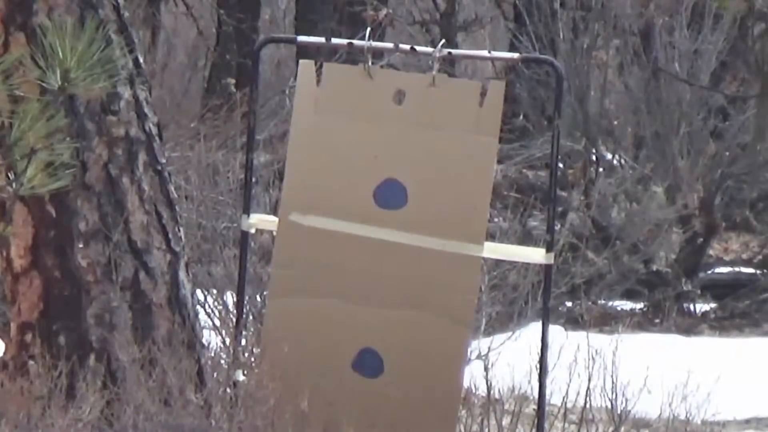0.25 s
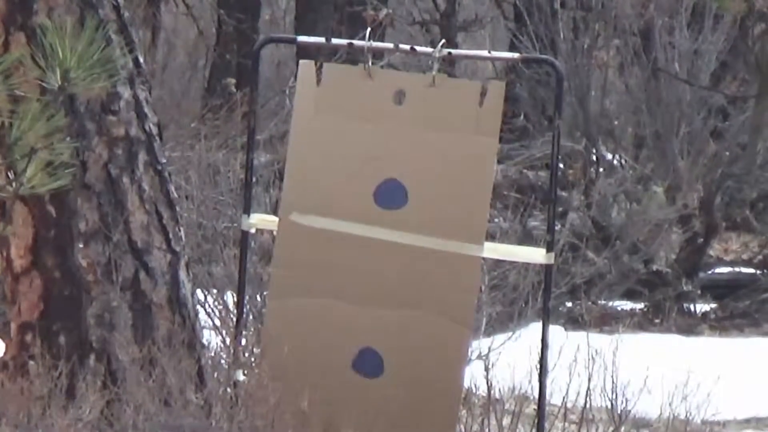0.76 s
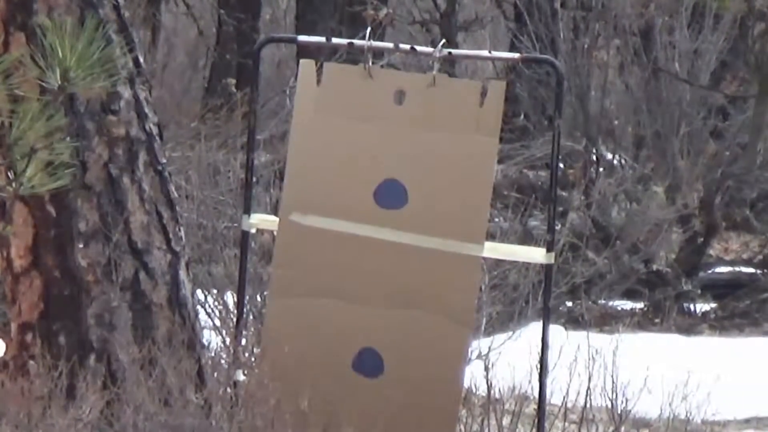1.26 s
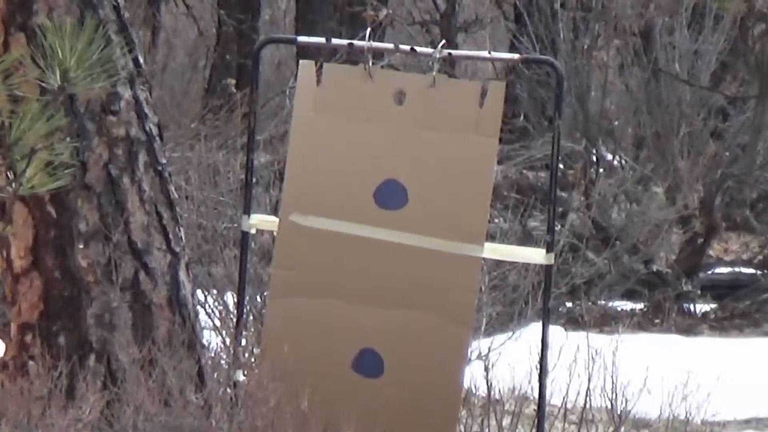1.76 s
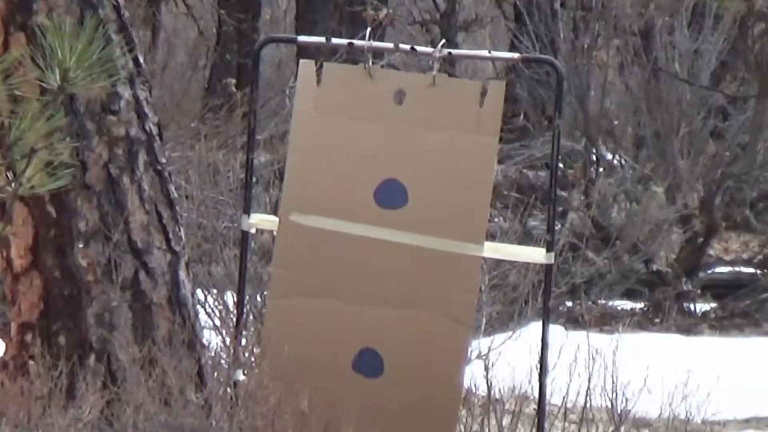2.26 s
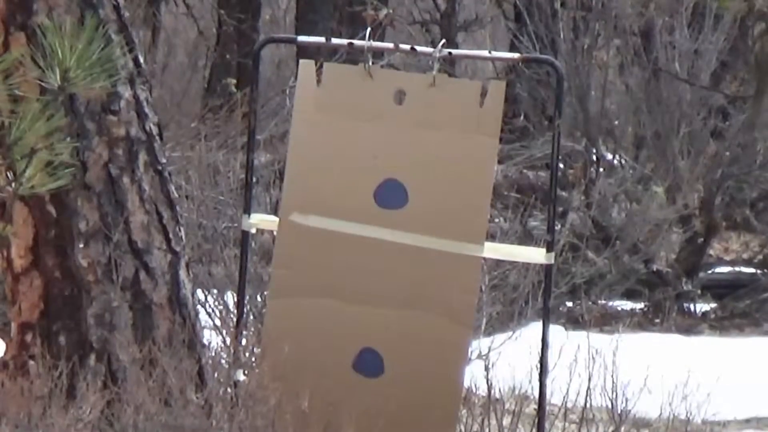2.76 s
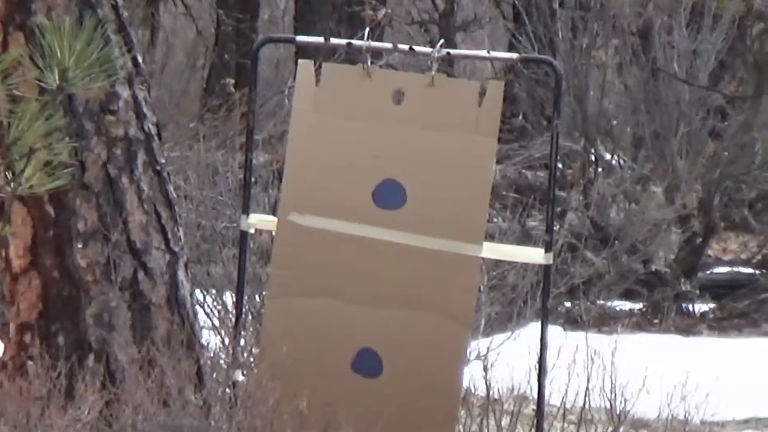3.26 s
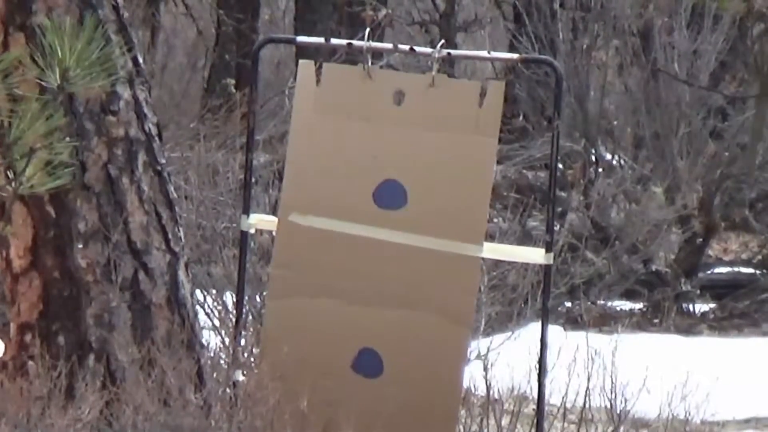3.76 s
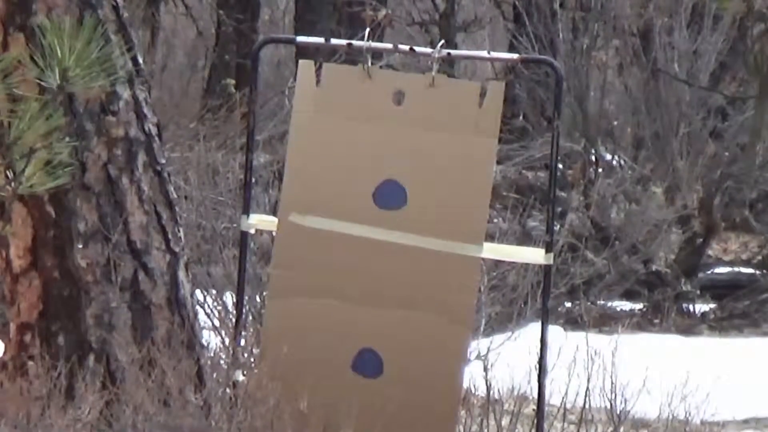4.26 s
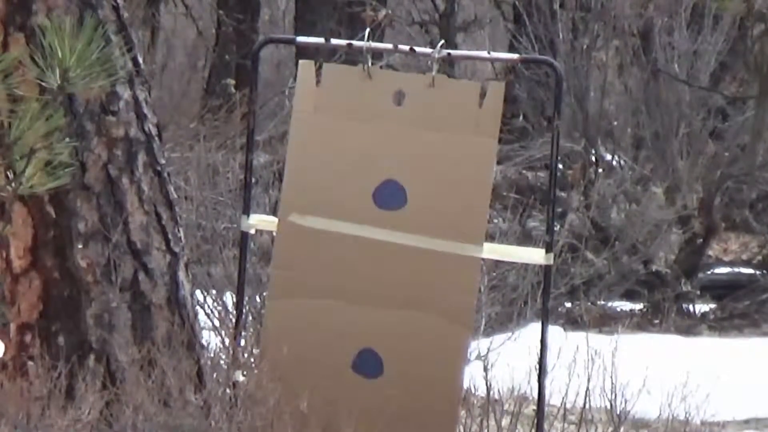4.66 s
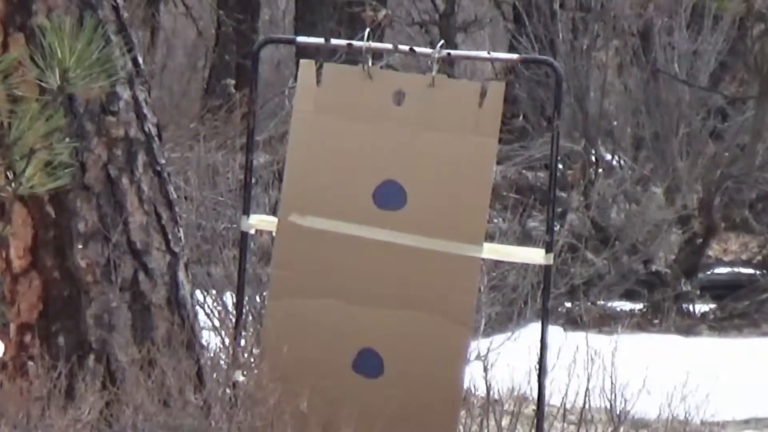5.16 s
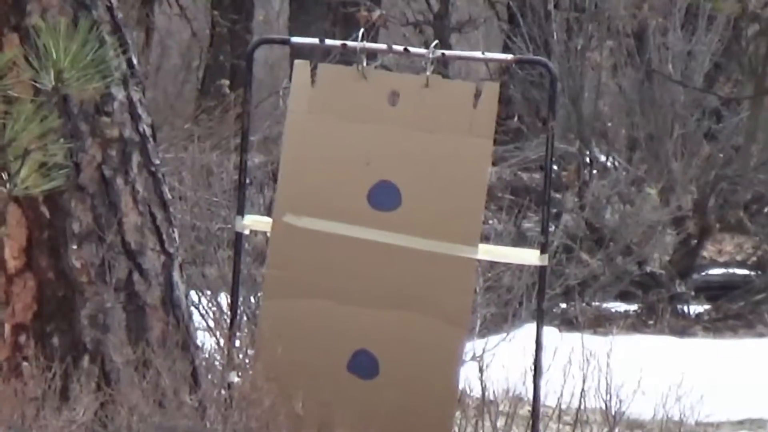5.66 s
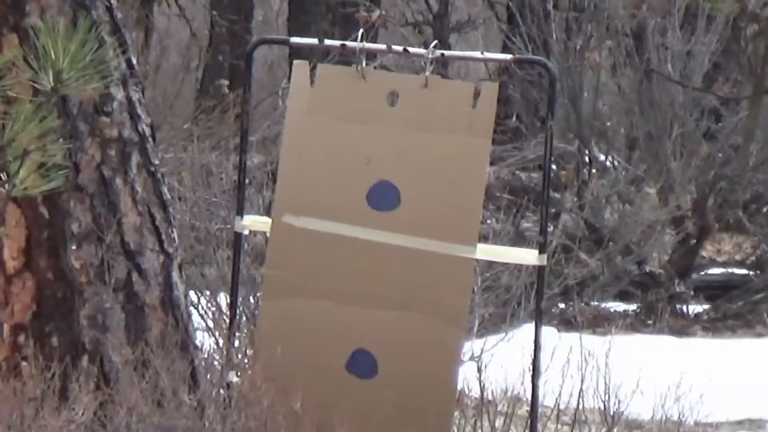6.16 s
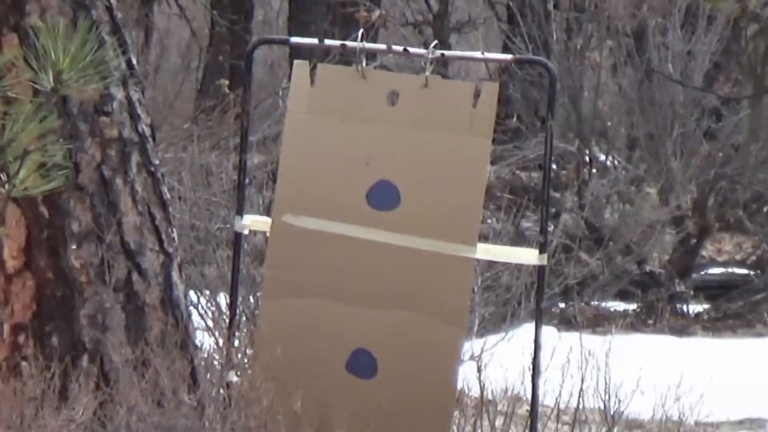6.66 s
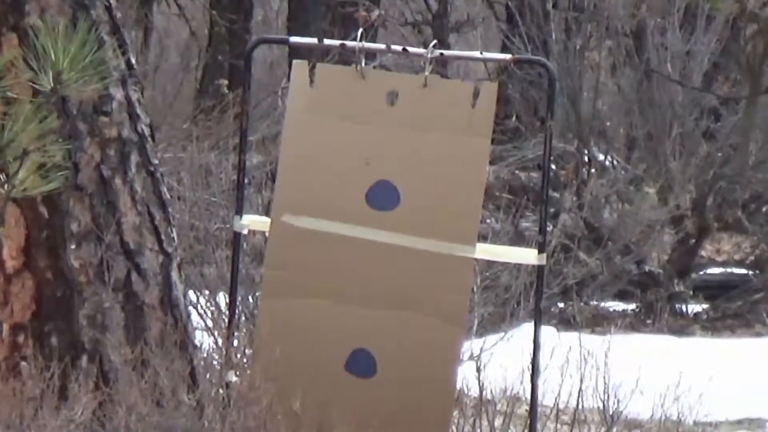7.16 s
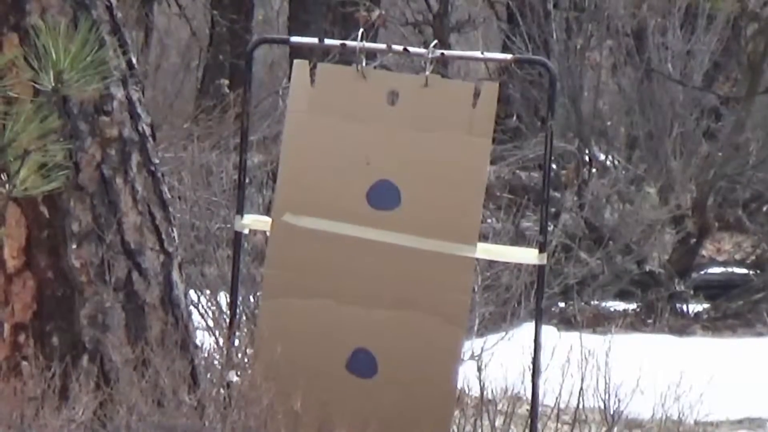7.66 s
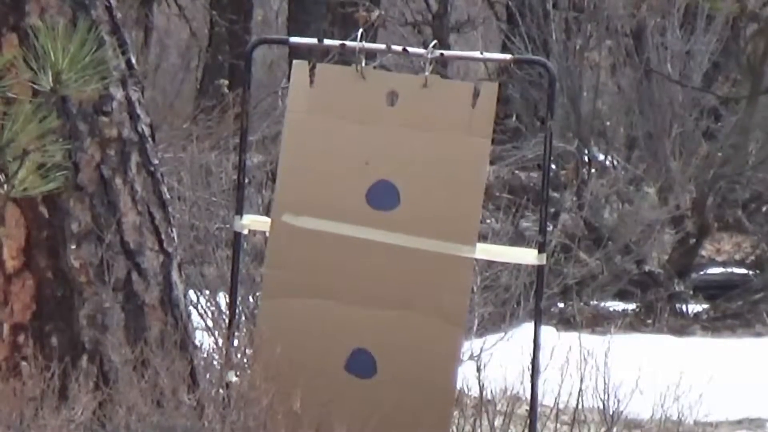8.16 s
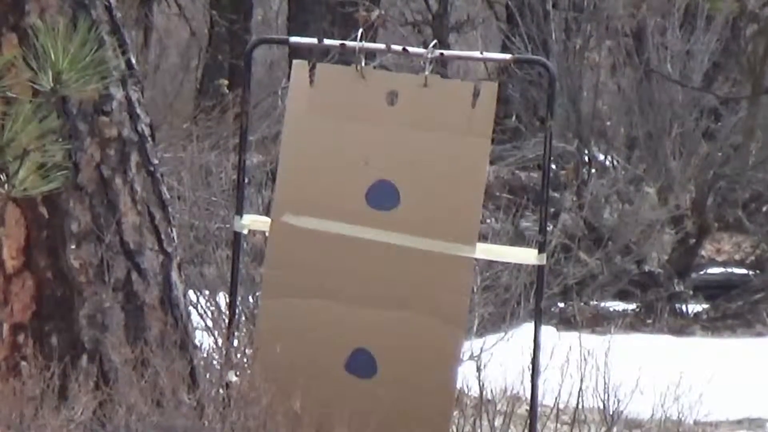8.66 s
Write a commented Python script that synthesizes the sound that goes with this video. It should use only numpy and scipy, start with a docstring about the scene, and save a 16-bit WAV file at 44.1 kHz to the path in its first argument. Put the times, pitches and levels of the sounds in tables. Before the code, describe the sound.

Outdoors among trees, a bolt-action rifle is cycled close by: metal clicks and slides, the wooden stock knocks and a sleeve rustles softly. After a pause of about two seconds comes a single loud shot, its crack followed by a dull boom and a long echo through the forest. While that fades, the bolt clacks back and forward once more and the empty case tinkles briefly.

```python
"""First comes the fading roll of a rifle shot, scattered by a snowy pine wood, over a faint hiss of air.
Close by on the right the bolt is worked: a sleeve brushes, the stock knocks, steel parts clack and
slide, and the struck brass case rings. The rifle fires again; the blast rolls back from trunks and a
hillside, duller as it fades because treble is absorbed along the way. A limiter holds the blast flat
for half a second. Then the bolt is worked once more."""
import sys
import numpy as np
from scipy import signal
from scipy.fft import rfft, irfft
from scipy.io import wavfile
from scipy.ndimage import uniform_filter1d

SR = 44100
rng = np.random.default_rng(int(sys.argv[2]) if len(sys.argv) > 2 else 0)


def store_wav(level_fs):
    """Save 16-bit WAV to argv[1]."""
    pcm = np.round(np.clip(np.atleast_2d(level_fs), -1, 1) * 32767)
    wavfile.write(sys.argv[1], SR, pcm.T.astype(np.int16))


N = 393813
TIME = np.arange(N) / SR
EARLIER_SHOT_S, SHOT_S = -2.11, 5.386  # of the earlier shot only the roll is heard
BODY_SIDE_DB, TICK_SIDE_DB = -8, -15  # stereo width (side minus mid) of full and of bright sounds


def undb(db):
    """Amplitude ratio of a level in decibels."""
    return 10 ** (np.asarray(db) / 20)


def unit(x):
    """Normalisation to an rms of 1."""
    return x / np.sqrt(np.mean(x ** 2))


def fade(t, t60):
    """Exponential decay from t = 0, falling 60 dB in t60 seconds."""
    return (t >= 0) * np.exp(-np.log(1000) * np.maximum(t, 0) / t60)


def pulse(t, rise_s, t60):
    """Exponential decay with a linear onset."""
    return fade(t, t60) * np.clip(t / rise_s, 0, 1)


def add(out, s, x):
    """Superposition of x on out from time s."""
    i = int(s * SR)
    out[..., i:i + x.shape[-1]] += x[..., :max(N - i, 0)]


def at_hz(hz, table, column=1):
    """Interpolation of a spectrum table on a logarithmic frequency axis."""
    rows = np.array(table)
    return np.interp(np.log(np.maximum(hz, 1)), np.log(rows[:, 0]), rows[:, column])


def colour(x, table, size=2048):
    """Minimum-phase filtering: folding the cepstrum makes the given spectrum causal."""
    gain = undb(at_hz(np.linspace(0, SR / 2, size // 2 + 1), table))
    cepstrum = irfft(np.log(gain))
    cepstrum[1:size // 2] *= 2
    cepstrum[size // 2 + 1:] = 0
    response = irfft(np.exp(rfft(cepstrum)))
    return signal.fftconvolve(x, response[None], axes=1)[:, :x.shape[1]]


def noise(size, side_db):
    """Partly coherent stereo noise: an in-phase part plus a weaker antiphase part."""
    mid, side = rng.standard_normal((2, size))
    return unit(mid + undb(side_db) * np.array([side, -side]))


def pan(x, left_db):
    """Placement by level difference, left minus right."""
    return x * undb(np.array([[1], [-1]]) * left_db / 2)


def band(x, lo_hz, hi_hz, order=2):
    """Butterworth band-pass filtering."""
    return signal.sosfilt(signal.butter(order, [lo_hz, hi_hz], "band", fs=SR, output="sos"), x)


def walk(rate_hz):
    """Smooth random modulation with an rms of 1."""
    step = int(SR / rate_hz)
    stairs = np.repeat(rng.standard_normal(N // step + 1), step)
    return unit(uniform_filter1d(stairs, step)[:N])


def ring(t, modes):
    """Free vibration: a sum of damped sinusoidal modes."""
    return sum(undb(db) * np.sin(2 * np.pi * hz * t) * fade(t, t60) for hz, db, t60 in modes)


# Echo spectrum of the wood: f/Hz, level/dB, loss on top of the overall decay/(dB/s)
WOOD_SPECTRUM = [(30, -67, 12), (55.5, -47, -6), (85, -15.5, -3), (150, -4, 4.5), (277, -1, -2.5),
                 (480, -2.5, -3.5), (780, 1, -2), (950, -2.5, -2), (1460, 2, 1), (2350, 3.5, 10),
                 (3570, 9, 26), (5020, 4.5, 36), (6000, -7, 37), (11200, 3, 73), (15000, -11, 98)]
# Stereo width of the echoes: f/Hz, side minus mid level/dB
ECHO_WIDTH = [(60, 1), (110, -28), (200, -34), (380, -16), (700, -10), (1290, -7), (2380, -11), (4400, -35),
              (8120, -39), (15000, -86)]
# Their lean to the left: f/Hz, left minus right level/dB
ECHO_LEAN = [(60, 1.5), (110, 2.4), (200, 1.1), (380, 1.5), (700, 1.8), (1290, 1.6), (2380, 0.0),
             (4400, 0.0), (8120, 0.0), (15000, 0.0)]
def echoes(shot_s, patchy_db=1.27, size=1024):
    """Absorption: later echoes have travelled further and lost more treble."""
    hz, t, (mid, side) = signal.stft(rng.standard_normal((2, N)), SR, nperseg=size)
    side = side * undb(at_hz(hz, ECHO_WIDTH))[:, None]
    lean = pan(np.ones(len(hz)), at_hz(hz, ECHO_LEAN))[..., None]
    field = np.array([mid + side, mid - side]) * lean
    patches = uniform_filter1d(rng.standard_normal(mid.shape), 3, axis=0)
    patches = unit(uniform_filter1d(patches, 4, axis=1))  # interference, in frequency and time
    loss_db = np.outer(at_hz(hz, WOOD_SPECTRUM, column=2), np.maximum(t - shot_s, 0))
    tone_db = at_hz(hz, WOOD_SPECTRUM)[:, None] - loss_db + patchy_db * patches
    return signal.istft(field * undb(tone_db), SR, nperseg=size)[1][:, :N]


# Denser stands of trees that answer together: delay/s, level over the even roll/dB, T60/s
TREE_STANDS = [(0.269, -27, 0.11), (.41, 15, 0.19), (.52, 7.5, .4)]
def roll(gain_db=22, build_s=0.31, knee_s=0.41, swell_db=1.4, stand_rise_s=0.043):
    """Scattering from countless trunks: the reverberation builds, then decays by a power law."""
    out = np.zeros((2, N))
    for shot_s in (EARLIER_SHOT_S, SHOT_S):
        age = np.maximum(TIME - shot_s, 0)
        build = 1 - np.exp(-age / build_s)  # ever more trunks join in
        decay = (1 + age / knee_s) ** -4
        stands = sum(undb(db) * pulse(age - s, stand_rise_s, t60) for s, db, t60 in TREE_STANDS)
        out += echoes(shot_s) * build * decay * (1 + stands)
    return out * undb(gain_db + swell_db * walk(22))


# Spectrum of still air and hiss: f/Hz, relative level/dB
AIR_SPECTRUM = [(18, -55), (30, -44), (137, -3.5), (156, -7.5), (230, -2), (341, -4), (709, -1.5),
                (970, 0.5), (1110, 1.5), (1230, 0.5), (1640, -2.5), (2620, -3.5), (15500, -15.5)]
def air(level_db=-58):
    """Stationary broadband noise: quiet woodland air under a steady hiss."""
    return unit(colour(noise(N, side_db=-6), AIR_SPECTRUM)) * undb(level_db)


# Movements of the arm: middle t/s, level/dB, half length/s
ARM_MOVES = [(1.46, -59, 1), (3.38, -59, 0.34), (7.85, -68, 0.39)]
def sleeve(rustle_db=1.2):
    """Friction of cloth: a high hiss swells and sinks with each move of the arm."""
    cloth = unit(band(noise(N, TICK_SIDE_DB), 4700, 19500, order=1))
    arm = sum(undb(db) * np.exp(-((TIME - s) / length) ** 2) for s, db, length in ARM_MOVES)
    return cloth * arm * undb(rustle_db * walk(22))


# Knocks of hand and bolt handle on the stock: t/s, relative level/dB, f/Hz, T60/s
STOCK_KNOCKS = [(1.035, -45, 850, 0.14), (1.357, -41, 483, 0.04), (1.581, -44, 1100, 0.16),
                (1.721, -33, 1577, 0.038), (2.148, -31, 1250, .1), (2.368, -43.5, 754, .08),
                (2.926, -42, 327, .1), (3.232, -46, 420, 0.15), (3.378, -34.5, 496, 0.071),
                (7.397, -28, 1740, 0.036), (8.066, -30.5, 1160, 0.098)]
def stock(gain_db=3, band_ratio=1.57, contact_s=0.0016, thump_db=-19.5, thump_hz=460, thump_t60=0.15):
    """Damped vibration of wood: the stock answers each knock and each clack with a dull noise burst."""
    out, t = np.zeros((2, N)), np.arange(8192) / SR
    thumps = [(s, body_db + thump_db, thump_hz, thump_t60) for s, body_db, _, _ in STEEL_CLACKS]
    for s, db, hz, t60 in STOCK_KNOCKS + thumps:
        wood = unit(band(noise(len(t), side_db=-25), hz / band_ratio, hz * band_ratio))
        add(out, s, undb(db + gain_db) * wood * pulse(t, contact_s, t60))
    return out


# Impacts of bolt and cartridge: t/s, relative body level/dB, relative tick level/dB, T60/s
STEEL_CLACKS = [(1.625, -27.5, -25.5, 0.028), (1.72, -27.5, -31, 0.027), (1.8363, -27.5, -15, 0.011),
                (1.841, -33.5, -31, 0.094), (1.862, -34, -28.5, 0.032), (1.996, -41.5, -50, 0.016),
                (2.108, -38, -39.5, 0.018), (2.136, -38, -32, .03), (2.144, -26, -21.5, 0.057),
                (2.165, -29, -26, 0.02), (2.191, -31, -18.5, 0.019), (2.21, -25, -21.5, 0.037),
                (2.25, -31, -19.5, 0.048), (2.268, -28, -22, 0.091), (2.772, -30, -28, .035),
                (2.782, -24.5, -23.5, 0.13), (2.823, -33, -21, 0.049), (2.839, -33, -18.5, .016),
                (2.861, -27, -18, 0.052), (2.971, -26.5, -21.5, 0.042), (2.993, -30, -31, 0.013),
                (3.13, -34.5, -30, 0.073), (3.146, -25, -19, 0.013), (3.163, -23.5, -20.5, 0.053),
                (3.379, -43, -45, 0.011), (7.2417, -34.5, -30.5, 0.017), (7.266, -41, -42, 0.014),
                (7.384, -40, -44, 0.0092), (7.398, -25.5, -25, 0.014), (7.495, -25, -17, 0.018),
                (7.91, -39, -48, 0.021), (7.969, -36.5, -50, .015), (8.064, -29, -22, 0.048),
                (8.098, -24, -14.5, 0.0096), (8.114, -27, -30, 0.023), (8.153, -28, -23.5, 0.11),
                (8.178, -28, -18.5, 0.055), (8.7224, -36.5, -33, 0.045), (8.767, -35, -31.5, 0.025),
                (8.832, -26.5, -22.5, 0.095), (8.854, -26.5, -22, 0.037), (8.883, -28.5, -16.5, 0.032),
                (8.9, -26, -19, 0.019)]
def clacks(rebound_s=0.007, spread_octaves=0.25, rebound_db=-12):
    """Inelastic impact: each part strikes and rebounds once. Yields (t/s, body gain, tick gain, T60/s)."""
    for s, body_db, tick_db, t60 in STEEL_CLACKS:
        yield s, undb(body_db), undb(tick_db), t60
        delay = rebound_s * 2 ** (spread_octaves * rng.standard_normal())
        yield s + delay, undb(body_db + rebound_db), undb(tick_db + rebound_db), t60


# Resonances of receiver and barrel: f/Hz, bandwidth/Hz, level against the broad spectrum/dB
RECEIVER_MODES = [(1730, 70, -1), (1920, 60, -1), (2860, 70, -5), (3420, 70, -3), (4040, 60, -7),
                  (7150, 300, -7), (7980, 350, -7), (12700, 200, -6)]
def receiver(force, spectrum, gain_db=-2, wander_db=2):
    """Forced resonance: contacts ring the action, whose modes stand out by turns."""
    response = undb(at_hz(np.linspace(0, SR / 2, 512), spectrum))
    broad = colour(force, spectrum) / np.sqrt(np.mean(response ** 2))
    modes = np.zeros((2, N))
    for hz, width, db in RECEIVER_MODES:
        mode = signal.lfilter(*signal.iirpeak(hz, hz / width, fs=SR), broad)
        modes += undb(db + wander_db * walk(13)) * mode
    return undb(gain_db) * (broad + modes)


# Spectrum of the action's body: f/Hz, relative level/dB
BODY_SPECTRUM = [(60, -41), (150, -28), (300, -15), (700, -6), (1300, -1), (1800, -1), (2600, 0),
                 (3800, 0.5), (5800, -6.5), (8000, -13.5), (14000, -105)]
# Spectrum of the bright tick of steel contact: f/Hz, relative level/dB
TICK_SPECTRUM = [(100, -78), (2000, -37), (5000, -20), (7500, -2), (10000, -1.5), (12500, 1.5),
                 (14500, -11), (16000, -1.5)]
def bolt(impact_db=4, rattle_db=-21, rasp_body_db=-5, rasp_tick_db=-4, fits_db=4, chatter_db=1):
    """Incoherent addition: fast-dying impacts and a fitful rasp sum in power and drive the receiver."""
    body_power, tick_power = np.zeros((2, N))
    t = np.arange(8192) / SR
    for s, body_gain, tick_gain, t60 in [*clacks(), *catches()]:
        rattle = undb(rattle_db) * fade(t, 3 * t60)
        impact = undb(impact_db) * (fade(t, t60) + rattle)
        add(body_power, s, (body_gain * impact) ** 2)
        add(tick_power, s, (tick_gain * impact) ** 2)
    rasp = (friction(TIME) + clack_tails()) * unit(undb(fits_db * walk(450)))
    body_power += (undb(rasp_body_db) * rasp) ** 2
    tick_power += (undb(rasp_tick_db) * rasp) ** 2
    chatter = unit(undb(chatter_db * walk(2500)))
    body = receiver(np.sqrt(body_power) * chatter * noise(N, BODY_SIDE_DB), BODY_SPECTRUM)
    tick = receiver(np.sqrt(tick_power) * chatter * noise(N, TICK_SIDE_DB), TICK_SPECTRUM)
    body[1] = np.roll(body[1], 2)  # arrival times differ by two samples
    return pan(body, left_db=-6.5) + pan(tick, left_db=1.5)


# Reflections from nearby trunks: delay/s, relative level/dB
NEAR_TRUNKS = [(0.038, -26.5), (.061, -24.5), (.074, -24.5), (.088, -24)]
def clearing(direct, brush_db=-19, brush_t60=0.7, trunk_t60=0.0054, dull_hz=6500, size=26000):
    """Early reflection and diffusion: near trunks add short smears, the brush behind them a soft tail."""
    t = np.arange(size) / SR
    trunks = sum(undb(db) * unit(fade(t - s, trunk_t60)) for s, db in NEAR_TRUNKS)
    brush = undb(brush_db) * unit(fade(t, brush_t60))
    response = band(noise(size, side_db=-5) * (trunks + brush) / np.sqrt(size), 100, dull_hz)
    return direct + signal.fftconvolve(direct, response, axes=1)[:, :N]


# Short rasping tails after a clack: t/s, relative level/dB
CLACK_TAILS = [(1.889, -34.5), (7.512, -34.5)]
def clack_tails(t60=0.28):
    """Exponential decay: envelope of a short rasp just after the sharp clack of lifting the handle."""
    return sum(undb(db) * fade(TIME - s, t60) for s, db in CLACK_TAILS)


# Bolt strokes, back and forward in turn: start t/s, fastest t/s, end t/s, relative peak level/dB
BOLT_STROKES = [(2.101, 2.273, 2.463, -33), (2.701, 2.804, 3.03, -32), (8.027, 8.192, 8.215, -29.5),
                (8.785, 8.84, 9.1, -28)]
def friction(t, gather_db=11, slow_db=21):
    """Friction noise grows with speed: its envelope swells to each stroke's fastest moment, then sinks."""
    envelope = np.zeros(len(t))
    for start, fastest, end, db in BOLT_STROKES:
        speed_db = np.interp(t, [start, fastest, end], [-gather_db, 0, -slow_db])
        envelope += (t > start) * (t < end) * undb(db + speed_db)
    return envelope


def catches(rate_hz=49, over_friction_db=-1.5, scatter_db=2, t60=0.022, count=600):
    """Surface roughness: the sliding bolt catches on edges, giving small impacts at irregular times."""
    times = (np.arange(count) + rng.random(count)) / rate_hz
    gains = friction(times)[:, None] * undb(over_friction_db + scatter_db * rng.standard_normal((count, 2)))
    return [(s, body, tick, t60) for s, (body, tick) in zip(times, gains) if body > 0]


# Strikes on the brass case: t/s, level/dB
CASE_STRIKES = [(2.261, -22.5), (2.297, -22), (8.152, -23), (8.2054, -11), (8.729, -27.5)]
# Its modes, in close pairs: f/Hz, relative level/dB, T60/s
CASE_MODES = [(9800, -6, .19), (9830, -16, .17), (13535, 0, .15), (13568, -7, .16)]
def brass_case(contact_s=0.00078):
    """Beating: the split modes of the empty case interfere as it chimes."""
    out, t = np.zeros((2, N)), np.arange(SR // 2) / SR
    chime = ring(t, CASE_MODES) * np.minimum(t / contact_s, 1)
    for s, db in CASE_STRIKES:
        add(out, s, undb(db) * chime)
    return out


# Squeals of steel on steel: middle t/s, level/dB, f/Hz, half length/s
STEEL_SQUEALS = [(2.817, -31.5, 6320, 0.016), (3.15, -24.5, 4010, 0.0038), (8.155, -23, 13900, .004)]
def squeals(spread=0.019):
    """Stick-slip friction: one narrow resonance sings for a moment."""
    out = np.zeros(N)
    for s, db, hz, length in STEEL_SQUEALS:
        tone = unit(band(rng.standard_normal(N), hz * (1 - spread), hz * (1 + spread)))
        out += undb(db) * tone * np.exp(-((TIME - s) / length) ** 2)
    return out


def snap(gain_db=-22, lead_s=0.0056, length_s=0.0042):
    """A broadband transient: a brief snap just ahead of the blast."""
    age = TIME - SHOT_S + lead_s
    gate = (age > 0) * (age < length_s)
    return undb(gain_db) * band(noise(N, TICK_SIDE_DB), 500, 16000, order=3) * gate


# Spectrum of the muzzle blast: f/Hz, relative level/dB
BLAST_SPECTRUM = [(40, -38), (130, -21.5), (280, -5.5), (450, -1.5), (750, -1), (1300, -4), (2500, -7.5),
                  (6000, -17), (14000, -89)]
def muzzle_blast(gain_db=15.5, rise_s=0.0051, t60=0.67):
    """Impulsive noise: the blast rises in milliseconds and decays exponentially."""
    roar = unit(colour(noise(N, side_db=-7), BLAST_SPECTRUM))
    return undb(gain_db) * roar * pulse(TIME - SHOT_S, rise_s, t60)


# The direct crack, then its returns: delay/s, level/dB, T60/s
CRACK_PATHS = [(0, 12.5, 0.32), (.033, 6, 0.12), (.18, -11, .15), (.265, -14.5, 0.34), (.336, -13, 0.075),
               (.405, -24, .4)]
def crack(crackle_db=4, return_band_hz=(2000, 10000)):
    """Discrete echoes: the shot's bright crack returns from single trunks in a narrower band."""
    direct, *returns = (undb(db) * fade(TIME - SHOT_S - delay, t60) for delay, db, t60 in CRACK_PATHS)
    crackle = unit(colour(noise(N, TICK_SIDE_DB), TICK_SPECTRUM)) * undb(crackle_db * walk(300))
    reflected = crackle * np.linalg.norm(returns, axis=0)  # the returns add in power
    return crackle * direct + band(reflected, *return_band_hz)


# Modes of nearby steel: f/Hz, level/dB, T60/s
STEEL_MODES = [(5755, -47, 3.4), (6896, -47, 3.2), (10020, -56, 3), (14120, -39, 1.6)]
def ringing_steel():
    """Shock excitation: the blast sets lightly damped steel ringing."""
    return ring(TIME - SHOT_S, STEEL_MODES)


# Spectrum of the hillside's echo: f/Hz, relative level/dB
BOOM_SPECTRUM = [(30, -37), (70, -27), (140, -6), (260, 9), (450, 6), (800, -8), (2500, -60)]
def hillside(gain_db=-5, delay_s=0.344, rise_s=0.054, t60=0.6):
    """Distant reflection: the hillside returns the blast as a late, dull boom."""
    rumble = unit(colour(noise(N, side_db=-4.5), BOOM_SPECTRUM))
    return pan(undb(gain_db) * rumble * pulse(TIME - SHOT_S - delay_s, rise_s, t60), left_db=3)


def scene():
    """Superposition of the roll, the air, the work on the bolt and the shot."""
    background = roll() + air()
    reloading = clearing(sleeve() + stock() + bolt()) + brass_case() + squeals()
    shot = snap() + muzzle_blast() + crack() + ringing_steel() + hillside()
    return background + reloading + shot


def record(dry, ceiling_db=-15, window_s=0.0058, release_s=0.0068, top_hz=15800):
    """Limiting: a fast gain control holds the short-term level under a ceiling; a low-pass cuts the top."""
    power = uniform_filter1d(np.mean(dry ** 2, axis=0), int(window_s * SR))
    pole = np.exp(-1 / (release_s * SR))
    lagging = signal.lfilter([1 - pole], [1, -pole], power)
    held = np.maximum(power, lagging)  # clamps at once, lets go more slowly
    ceiling = undb(ceiling_db)
    gain = ceiling / np.sqrt(np.maximum(held, ceiling ** 2))
    low_pass = signal.ellip(10, 0.2, 70, top_hz, fs=SR, output="sos")
    return signal.sosfilt(low_pass, dry * gain)


dry = scene()
out = record(dry)
store_wav(out)
```